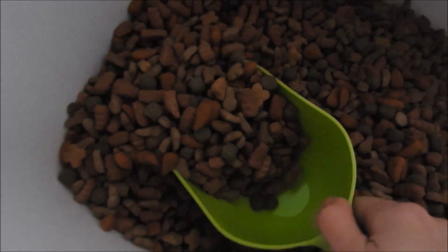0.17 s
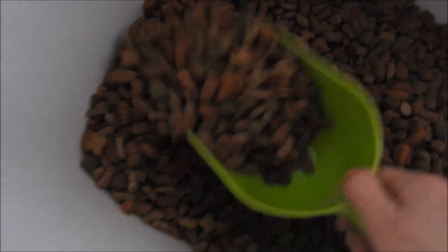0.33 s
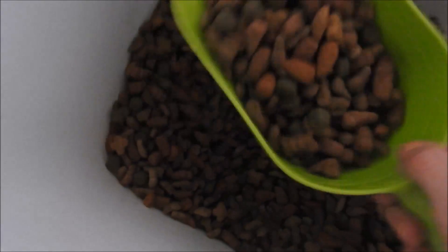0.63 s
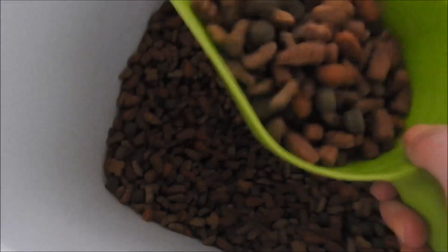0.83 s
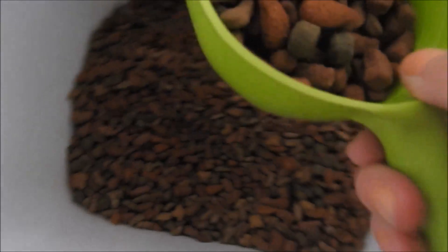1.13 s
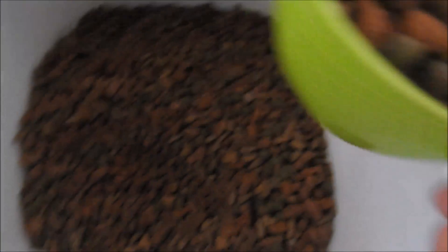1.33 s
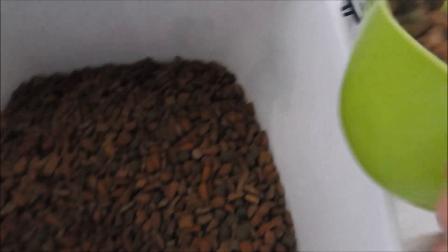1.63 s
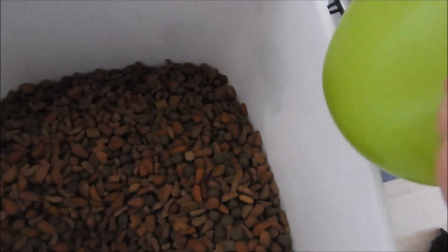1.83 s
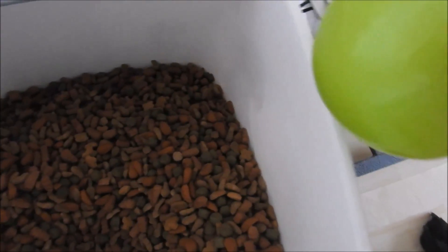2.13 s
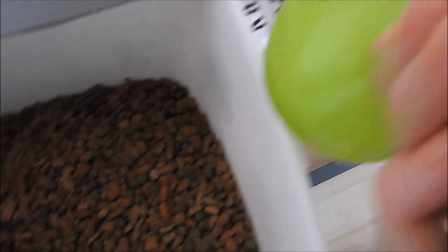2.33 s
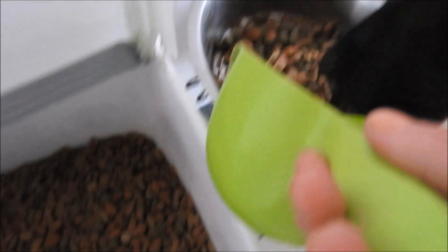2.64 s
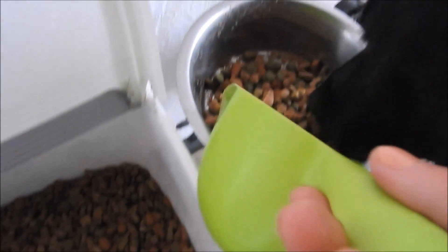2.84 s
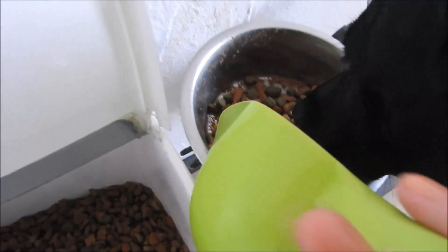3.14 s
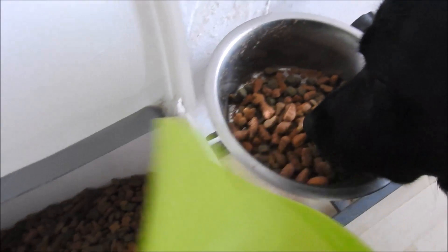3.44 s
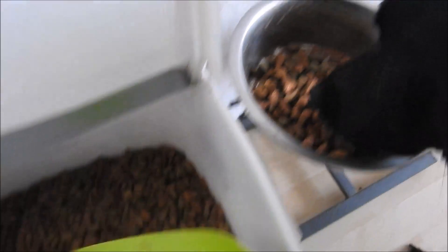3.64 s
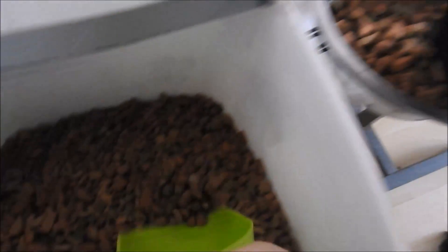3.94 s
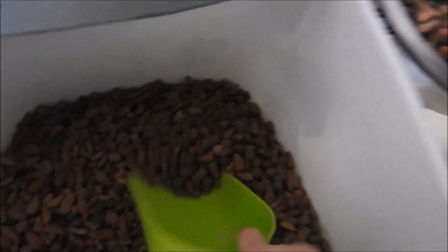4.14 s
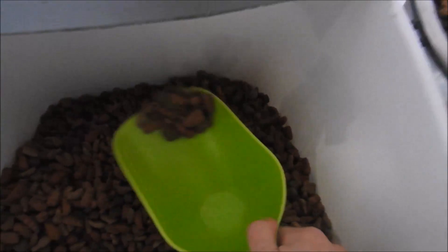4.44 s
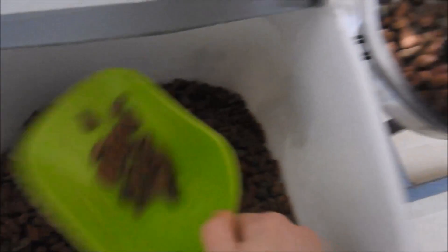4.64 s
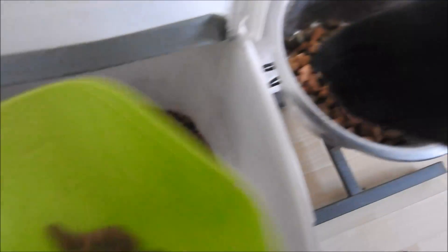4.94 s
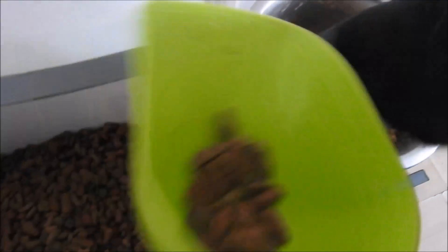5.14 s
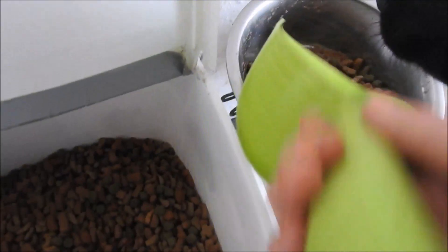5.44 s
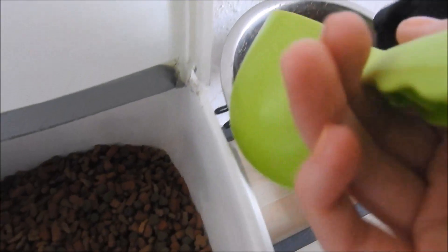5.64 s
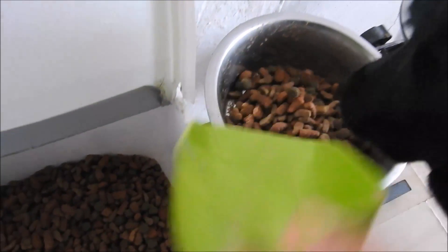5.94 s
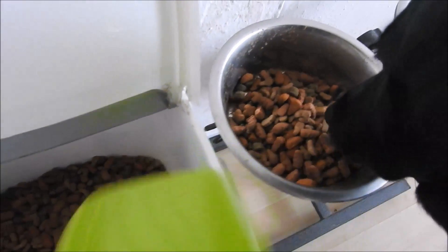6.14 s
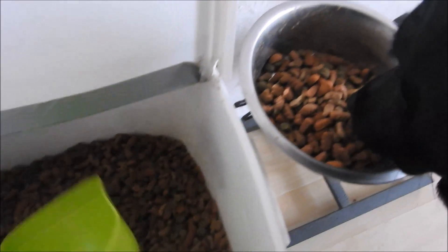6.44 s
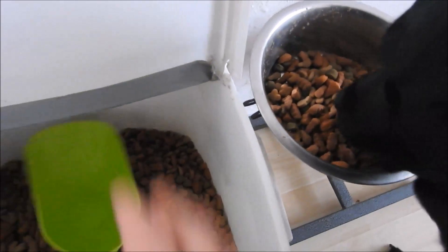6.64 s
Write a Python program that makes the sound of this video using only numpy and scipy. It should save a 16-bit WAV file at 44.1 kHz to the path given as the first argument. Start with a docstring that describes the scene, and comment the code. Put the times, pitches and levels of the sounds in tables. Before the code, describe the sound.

A plastic scoop digs through dry kibble, a scoopful clatters into a steel bowl, a dog crunches faintly, then louder digging and a toss.

```python
"""A plastic scoop digs dry kibble out of a plastic bin and tips it into a steel bowl, in a small room.
A dog crunches a few pellets; the scoop digs again, drops a few more in the bowl and is tossed back in the bin.
Pellet contacts are short noise bursts, coloured as crunch and fizz, that also excite scoop, bin or bowl:
the scoop and the bin's boom are coloured noise and decaying modes, the bowl mostly modes."""
import sys
import numpy as np
from scipy import signal
from scipy.fft import rfft, irfft
from scipy.io import wavfile
from scipy.ndimage import uniform_filter1d

SR = 44100
rng = np.random.default_rng(int(sys.argv[2]) if len(sys.argv) > 2 else 0)


def wrap_up_sound(samples):
    """Save the sound to the file named by the first command line argument, as 16-bit audio."""
    columns = np.atleast_2d(samples).T
    # keep every value between -1 and 1, then stretch to whole-number steps
    tamed = np.clip(columns, -1, 1)
    steps = np.round(tamed * 32767).astype(np.int16)
    wavfile.write(sys.argv[1], SR, steps)


N = 298998  # length [samples]

# spectra of pellet crunch, pellet fizz, scoop hollow and splash on steel: (frequency [Hz], level [dB])
CRUNCH = [(500, -23), (1000, -7), (1300, -2.5), (2000, -0.5), (2450, -3), (2900, -2.5), (3700, -7),
          (4500, 0.5), (6500, -30.5)]
FIZZ = [(2000, -33), (3700, -9.5), (4600, -1), (5800, 0.5), (7500, -3.5), (10000, -6), (16000, -8.5)]
SCOOP = [(30, -52), (150, -18), (280, 1), (430, -2), (560, 2), (700, 4), (850, 2.5), (1030, 2.5),
         (1250, -6.5), (1900, -43)]
STEEL_FIZZ = [(1500, -41.5), (3700, -7.5), (4600, -2.5), (6200, 6.5), (8000, 6.5), (9600, 7.5), (16000, -9)]
# moves of the scoop through packed kibble: digging, lifting, shaking, tilting, digging again, dropped on the heap
# (start [s], attack [s], hold [s], settling t60 [s], crunch level [dB],
#  then relative to crunch: fizz [dB], scoop hollow [dB], bin boom [dB])
DIGS = [(-0.01, 0.0033, 0.2, 0.61, -39, 1, 1, 11.5), (0.09, 0.044, 0.016, 0.24, -27, -1, -1, -4),
        (0.23, .015, .025, 0.16, -48.5, -24, 5.5, 17), (0.43, .08, 0.23, .4, -29, -3.5, -2.5, -5.5),
        (0.78, 0.013, 0.133, 0.4, -32, 1, -7.5, -9.5), (1.08, 0.022, 0.022, 0.061, -44, -10, -3.5, -2.5),
        (1.16, 0.019, 0.091, 0.23, -73.5, -12, 15, 23.5), (1.505, 0.038, 0.04, 0.34, -39.5, 0.5, -9, -2.5),
        (1.715, 0.013, 0.041, 0.71, -36, 1.5, -10.5, -10.5), (1.92, 0.071, 0.13, 0.23, -33, 0, -7.5, -6),
        (2.73, 0.028, 0.025, 0.28, -30, -10, -9.5, -14), (2.93, 0.036, .13, 0.18, -52, 8, -5, -26),
        (3.965, 0.003, 0.23, 0.5, -23, -3.5, -4.5, -3.5), (4.23, 0.033, 0.14, 0.2, -28.5, 1, -4, -5.5),
        (4.455, 0.0069, 0.015, 0.27, -26, -1, -2, 2), (4.53, 0.0068, 0.098, 0.42, -20.5, -5.5, 0.5, -4.5),
        (4.66, 0.032, 0.12, 0.62, -33.5, 0.5, -13, -14), (5.06, 0.022, 0.046, 0.16, -71, 8, 11.5, 29),
        (6.68, 0.0068, 0.058, 0.28, -31, -4, -12.5, -9.5)]
# a few loose pellets sliding along the scoop: (the eight columns of DIGS, chatter pitch [Hz])
SLIDES = [(5.201, 0.081, 0.052, 0.14, -41, 4, -13.5, -18, 3000),
          (5.41, .03, 0.15, 0.32, -55.5, -0.5, -16, -15, 1700),
          (5.551, 0.056, 0.073, .3, -42, 3, -18, -11, 2500),
          (5.63, 0.031, 0.14, 0.44, -32, 2, -6, -19, 2500),
          (5.76, 0.061, .17, 0.37, -38, -3, 9.5, -3.5, 1200),
          (6.031, 0.02, .14, 0.35, -41.5, -1, -8, 6, 1700)]
# air and base of the filled bowl: (frequency [Hz], level [dB], t60 [s])
BOWL_HOLLOW = [(215.3, -4.5, 0.16), (258, -11.5, .13), (566.4, 0, 0.071), (640.7, 3, .15), (675, 0, 0.12),
               (710.8, 7.5, 0.048), (777, -2, 0.047), (985, -11.5, 0.29)]
# the stream drumming on the bowl's wall: (level [dB], hold [s], t60 [s])
POUR_WALL = (-15, 0.036, 1)
POUR_START_S = 2.14


def amp(db):
    """Gain of a level in dB."""
    return 10 ** (np.asarray(db) / 20)


def seconds(length):
    """Time axis in seconds."""
    return np.arange(int(length * SR)) / SR


def read(points, hz):
    """Reads a curve between its points, along log frequency."""
    f, value = np.transpose(points)
    return np.interp(np.log(hz + 1), np.log(f + 1), value)


def add(mix, s, sound):
    """Adds a sound to the mix from a given second on."""
    part = mix[:, max(round(s * SR), 0):][:, :sound.shape[1]]
    part += sound[:, :part.shape[1]]


def unit(x, over=None):
    """Scales to rms 1, over the whole sound or its first seconds."""
    return x / np.sqrt(np.mean(x[..., :over and int(over * SR)] ** 2) + 1e-20)


def steadied(x, size=1500):
    """Scales to a running rms of 1, leaving single grains their contrast."""
    return x / np.sqrt(abs(uniform_filter1d((x ** 2).mean(0), size)) + 1e-12)


def through(x, response):
    """Excites a body, given by its impulse response, with a sound."""
    return signal.oaconvolve(x, np.atleast_2d(response), axes=1)[:, :x.shape[1]]


def colour(x, points, size=4096):
    """Causal minimum-phase filter with the given spectrum."""
    log_gain = np.log(amp(read(points, abs(np.fft.fftfreq(size, 1 / SR)))))
    spectrum = np.exp(np.conj(signal.hilbert(log_gain)))
    return through(x, np.fft.ifft(spectrum).real[:size // 2])


def resonate(x, hz, q):
    """One resonance of gain 1."""
    return signal.lfilter(*signal.iirpeak(hz, q, SR), x)


def ports(x):
    """Two unrelated sounds mixed as two microphone ports hear one source: alike in the bass, apart in the treble."""
    # likeness of the two ports: (frequency [Hz], correlation [0-1])
    likeness = [(60, .995), (560, .98), (1200, .93), (2500, .83), (5300, .72), (8000, .55), (11200, .3)]
    # phase by which left leads: (frequency [Hz], lead [rad])
    left_lead = [(1000, -0.017), (4000, -0.44), (7000, -1.2), (9500, 0.29), (12000, -0.79)]
    n = x.shape[1]
    hz = np.fft.rfftfreq(n, 1 / SR)
    a, b = rfft(x)
    alike = np.clip(read(likeness, hz), -1, 1)
    right = (alike * a + np.sqrt(1 - alike ** 2) * b) * np.exp(-1j * read(left_lead, hz))
    return irfft(np.array([a, right]), n)


def port_noise(n):
    """White noise as the two microphone ports hear it."""
    return ports(rng.standard_normal((2, n)))


def ring(modes, apart=.3, scatter_db=1.5):
    """One blow on a set of decaying modes; the point of contact changes their weights."""
    t, out = seconds(.6), 0
    for hz, db, t60 in modes:
        phase = rng.uniform(0, 2 * np.pi) + apart * rng.standard_normal((2, 1))
        decay = amp(db + scatter_db * rng.standard_normal() - 60 * t / t60)
        out = out + decay * np.sin(2 * np.pi * hz * t + phase)
    return out


def snap(decay, echo_db, echo_decay, size=4096):
    """A brittle contact followed by the scatter off nearby walls: noise with two exponential decays [s]."""
    t = np.arange(size) / SR
    envelope = np.exp(-t / decay) + amp(echo_db) * np.exp(-t / echo_decay)
    burst = rng.standard_normal((2, size)) * envelope
    return ports(np.pad(burst, ((0, 0), (20, 20))))


def grains(per_s, spread_db, decay, tone_db, count=16):
    """Random pellet contacts: many small, few large, in several sorts with a pitch each."""
    out = np.zeros((2, N))
    for hz in np.geomspace(1500, 9000, count):
        grain = snap(decay, echo_db=-12, echo_decay=.005, size=1024)
        tone = resonate(grain, hz, q=2.0)
        chance, size = rng.random(N) * SR * count / per_s, np.zeros(N)
        hit = chance < 1
        size[hit] = amp(spread_db * np.minimum(-np.log(chance[hit]), 4))
        out += through(size[None], unit(grain + amp(tone_db) * tone))
    return out


def swell(attack, hold, t60):
    """Pellets are set moving, keep moving, then settle faster and faster."""
    t = seconds(1.5)
    settling = np.maximum(t - attack - hold, 0) / t60
    return np.clip(t / attack, 0, 1) * amp(-60 * settling ** 1.1)


def levels(moves):
    """Gain curves of crunch, fizz, hollow and boom; overlapping moves add in power."""
    power = np.zeros((4, N))
    for start, attack, hold, t60, db, fizz_db, hollow_db, boom_db, *_ in moves:
        gains = amp(db + np.array([0, fizz_db, hollow_db, boom_db]))
        add(power, start, np.outer(gains, swell(attack, hold, t60)) ** 2)
    return np.sqrt(power)


def stroke(moves, contacts, pellet_colour, fizz_colour, scoop_colour):
    """Contacts sound directly, fizz, and shake the scoop and the bin wall."""
    # spectrum of the booming bin: (frequency [Hz], level [dB])
    bin_boom = [(25, -33.5), (50, -25), (75, -5.5), (96, 0), (125, -8.5), (160, -0.5), (200, 2.5),
                (260, -4.5), (350, -8), (600, -53)]
    crunch, fizz, hollow, boom = levels(moves)
    wall = colour(contacts + .5 * contacts.std() * port_noise(N), bin_boom)
    out = crunch * steadied(colour(contacts, pellet_colour))
    out = out + fizz * steadied(colour(contacts, fizz_colour))
    out = out + hollow * steadied(colour(contacts, scoop_colour))
    return out + boom * steadied(wall, size=2400)


def surges():
    """Kibble sticks and gives way: a random gain gliding between new values every 22 ms."""
    t = np.arange(N) / SR
    surge = np.interp(t / .022, np.arange(N), np.clip(rng.standard_normal(N), -2, 2))
    return unit(amp(3 * surge))


def chatter(contacts):
    """Sliding pellets chatter at a pitch of their own, through one sharp resonance."""
    out = np.zeros((2, N))
    for start, attack, hold, t60, db, *_, hz in SLIDES:
        gain = amp(db - 5.5) * swell(attack, hold, t60)
        add(out, start, gain * steadied(resonate(contacts[:, :len(gain)], hz, q=22)))
    return out


def rustle():
    """Packed pellets grind densely; the loose ones slide along the scoop in a thinner stream of contacts."""
    # spectra of the nearly empty scoop (loose crunch, thinner fizz, hollow): (frequency [Hz], level [dB])
    loose_crunch = [(500, -5.5), (1100, 1), (1580, 0), (1900, -1), (2500, 8), (2900, -5), (3700, -3),
                    (4500, 4), (6500, -35)]
    loose_fizz = [(2000, -34), (3700, -12), (5000, -1), (7500, -2), (10000, 0), (16000, -5.5)]
    empty_scoop = [(30, -63), (150, -4), (300, -19), (520, -7), (620, 2), (685, 6), (750, 4), (840, -23),
                   (1000, -4), (1120, -5), (1300, -16), (1900, -19)]
    packed = grains(per_s=900, spread_db=2.0, decay=0.00014, tone_db=1.0)
    loose = grains(per_s=400, spread_db=1.0, decay=0.000071, tone_db=0.0)
    digging = amp(-1.0) * surges() * stroke(DIGS, packed, CRUNCH, FIZZ, SCOOP)
    sliding = amp(-3.4) * stroke(SLIDES, loose, loose_crunch, loose_fizz, empty_scoop)
    return digging + sliding + chatter(loose)


def crack(db, fizz_db, hollow_db, pellet_hz):
    """A pellet slips or drops: a sharp tick, its own brief ring, and a hollow knock of the scoop."""
    # scoop modes: (frequency [Hz], level [dB])
    scoop_modes = [(490, 9), (690, -1.5), (950, 9), (1060, 4.5), (1170, 7)]
    tick = colour(snap(decay=.0014, echo_db=-14, echo_decay=.008), FIZZ)
    body = colour(snap(decay=.0022, echo_db=-14, echo_decay=.008), CRUNCH)
    body = body + amp(18.0) * resonate(body, pellet_hz, q=10)
    knock = colour(snap(decay=0.0012, echo_db=-17.5, echo_decay=0.0042), SCOOP)
    knock = knock + sum(amp(mode_db) * resonate(knock, hz, q=21) for hz, mode_db in scoop_modes)
    parts = [(body, 0), (tick, fizz_db), (knock, hollow_db - 5.5)]
    return amp(db) * sum(amp(part_db) * unit(part, over=0.0049) for part, part_db in parts)


def slips(count=8):
    """Pellets of several pitches slip at random, as loud and as hollow as the move that shifts them."""
    slips_per_s, spread_db = 22, 2.5
    crunch, fizz, hollow, _ = 20 * np.log10(levels(DIGS + SLIDES) + 1e-9)
    out, pitches = np.zeros((2, N)), np.geomspace(1300, 3600, count)
    due = (rng.random(N) < slips_per_s / SR) & (crunch > -48)  # only while kibble clearly moves
    for i in np.flatnonzero(due):
        # offsets from the move's own crunch, fizz and hollow
        db, fizz_db, hollow_db = spread_db * (2 * rng.random(3) - 1) + [2, 0.5, 1.5]
        fizz_db += fizz[i] - crunch[i]
        hollow_db += hollow[i] - crunch[i]
        add(out, i / SR, crack(crunch[i] + db, fizz_db, hollow_db, rng.choice(pitches)))
    return out


def cracks():
    """Single pellet cracks that stand out from the rustle."""
    # (time [s], crunch level [dB], fizz re crunch [dB], hollow setting re crunch [dB], pellet pitch [Hz])
    loud_cracks = [(0.0528, -24.5, -2.5, -29, 2990), (0.34, -26, -12, -6, 2920),
                   (0.3539, -21, 10.5, -4.5, 3040), (0.3575, -16.5, -29.5, -26.5, 2890),
                   (0.3798, -26.5, -23, -14, 2960), (0.427, -28.5, -8, -27, 3070),
                   (0.494, -26.5, -3, -11, 3495), (0.5413, -22, 2, -3.5, 2400),
                   (0.603, -26.5, -4, -3, 3530), (0.687, -22.5, -2, -32, 1690), (0.8336, -27, 5.5, 3, 3340),
                   (0.7265, -25, 8, -1, 3273), (0.8099, -22.5, 2.5, -8, 3640),
                   (0.8814, -24, 6.5, -18, 3500), (0.9042, -22, 10, -18, 2280),
                   (0.9299, -30, 5.5, -22, 2720), (1.009, -34, 3, -1, 3360), (1.2012, -47.5, -19, 12, 1600),
                   (1.2515, -45, -29, 14.5, 1533), (1.7256, -35, 5.5, -12, 3140),
                   (1.803, -28.5, 6.5, 2, 1542), (1.971, -22.5, -18, -17.5, 2650),
                   (2.968, -44, 5, 12.5, 1230), (3.213, -42.5, -6, -16, 3000), (3.968, -22.5, -1, -1, 1897),
                   (4.0542, -29, 8.5, -21, 2000), (4.121, -24, 13, -2, 1680), (4.142, -17.5, 3, -30, 2082),
                   (4.342, -20, 2, -5.5, 2620), (4.4029, -17, -15.5, -27, 2433),
                   (4.368, -24.5, -14, -3, 2520), (4.4625, -23.5, 3.5, -15, 2700),
                   (4.538, -17.5, 3.5, 5.5, 1900), (4.5551, -24, 9, 14, 1230), (4.584, -16, -7, -18, 1150),
                   (4.605, -29, -15, 18.5, 1700), (4.628, -12, -3.5, -11, 1120), (4.682, -23, 7, -2, 2350),
                   (4.7725, -10, -7, -8, 2960), (4.8325, -26.5, 5, -9, 2740), (4.857, -26, 7, -2.5, 3180),
                   (5.1704, -47, -26, 1, 3070), (5.649, -20.5, 4.5, -10, 1510),
                   (5.8049, -30.5, 6.5, 1, 2447), (6.0759, -25, -12.5, 7, 1470),
                   (6.0893, -29.5, 17, 4, 1816), (6.0924, -23.5, 12.5, -3, 2000),
                   (6.683, -17, 10.5, -7.5, 2048), (6.6866, -16.5, -2, -28, 2740),
                   (6.748, -16, 4.5, -32, 3770), (6.753, -23.5, 2, -10, 3560)]
    out = np.zeros((2, N))
    for s, *sound in loud_cracks:
        add(out, s, crack(*sound))
    return out


def bumps():
    """The scoop knocks hollowly against packed kibble; each soft blow rings one of its modes."""
    # (time [s], level [dB], frequency of the mode that answers [Hz])
    scoop_bumps = [(0.2463, -25.5, 448), (0.271, -35, 498), (0.545, -30, 567), (0.6573, -27.5, 436),
                   (0.728, -32, 514), (1.098, -49, 432), (1.122, -37, 444), (1.802, -19.5, 384),
                   (3.97, -23.5, 668), (4.2153, -31, 950.4), (4.435, -21.5, 512), (4.445, -37, 466),
                   (5.649, -19, 1057), (5.652, -26.5, 261), (5.826, -27, 680.7), (5.87, -22.5, 697),
                   (6.076, -27, 330), (6.139, -26, 572), (6.1592, -30.5, 712)]
    out = np.zeros((2, N))
    for s, db, hz in scoop_bumps:
        knock = colour(snap(decay=0.0016, echo_db=-9.5, echo_decay=0.013), SCOOP)
        add(out, s, amp(db) * unit(knock + amp(17) * resonate(knock, hz, q=17), over=0.0039))
    return out


def knocks():
    """The scoop bumps the bin, whose wall booms like a slack drum."""
    # knocks on the wall: (time [s], level [dB])
    wall_knocks = [(0.804, -32.5), (1.535, -35), (1.803, -15), (2.756, -40.5), (3.758, -55.5), (4.584, -21),
                   (5.067, -51), (5.65, -45), (6.073, -37.5), (6.685, -41), (6.75, -38)]
    # wall modes: (frequency [Hz], level [dB], t60 [s])
    wall_modes = [(72, -19, .25), (98, -1, .27), (122, -8, .24), (149, -4, .25), (197, -4, .13),
                  (218, -18, .26), (285, -15, .24)]
    soft_onset = 1 - np.exp(-seconds(.6) / 0.0086)
    out = np.zeros((2, N))
    for s, db in wall_knocks:
        boom = unit(ring(wall_modes, apart=0.097, scatter_db=-1.5), over=0.07)
        add(out, s, amp(db) * boom * soft_onset)
    return out


def bare_steel(s):
    """Share of the bowl's wall not yet muffled by the heap."""
    return np.clip(np.interp(s, [2.12, 2.35, 2.6], [.65, .4, .08]), 0, 1)


def steel_ring(t60_at_1k, tilt_db, evenness):
    """The bowl's wall modes in close pairs, detuned by the shifting load; many contacts even out their weights."""
    # wall modes: (frequency [Hz], level before evening and tilt [dB])
    wall_modes = [(963.6, -43.5), (1287, -23), (1448, -37.5), (1599, -16), (1723, -32), (1798, -42),
                  (1906, -48), (1970, -48.5), (2159, -36), (2315, -41), (2859, -31.5), (2929, -33),
                  (3004, -39.5), (3391, -34.5), (3505, -46), (3671, -48.5), (3957, -33.5), (4167, -42)]
    mean_db = np.mean([db for hz, db in wall_modes])
    modes = []
    for hz, db in wall_modes:
        db = db + evenness * (mean_db - db) + tilt_db * np.log2(hz / 1000)
        t60 = t60_at_1k * (1000 / hz) ** 0.14
        partner_hz = hz * (1 + 0.026 * rng.standard_normal())
        modes += [(hz, db, t60), (partner_hz, db - 3, t60 / 2)]
    return ring(modes, apart=.18, scatter_db=3)


def shimmer(t60, crowd_db, count=70):
    """The crowd of high modes of thin steel, at random pitches, with fixed modes, some louder than the crowd."""
    # fixed high modes, some louder than the crowd: (frequency [Hz], level [dB], t60 [s])
    top_modes = [(5394, -23.5, 0.27), (6400, -16.5, 0.24), (7400, -3.5, 0.18), (7730, -5.5, 0.28),
                 (8650, -4, 0.16), (10100, -15, 0.17)]
    crowd = [(hz, crowd_db, t60) for hz in rng.uniform(4200, 11500, count)]
    return ring(crowd + list(top_modes), apart=.37, scatter_db=3)


def strikes(top):
    """A clump hits the bowl: wall modes, dull clang, splash of treble, rim note and hollow of the base."""
    # clumps landing in the bowl: (time [s], strength [dB])
    landings = [(2.0844, -12), (2.0966, -14.5), (2.1544, -9.5), (2.1752, -15), (2.212, -12), (2.2646, -12),
                (2.3346, -17.5), (2.3839, -19), (2.4458, -27.5), (2.543, -22.5), (2.5826, -26),
                (2.6127, -25), (2.7399, -32), (5.9798, -23.5), (6.2159, -21.5)]
    # ring, splash and hollow offsets as pellets cover the base: (on steel [dB], on pellets [dB])
    land_ring = (0.1, -14.5)
    land_splash = (-13, 0.1)
    land_hollow = (-7.5, -21)
    # spectrum of the wall deadened by pellets lying on it: (frequency [Hz], level [dB])
    dull_clang = [(700, -34), (1100, -27), (1300, 5), (1600, 4), (1900, 0.5), (2500, -13), (2900, -13.5),
                  (3700, -13), (6000, -29)]
    # the long, thin rim note: (frequency [Hz], level [dB], t60 [s])
    rim_note = (3580, -22.5, .5)
    cover_s = .15  # time constant of the base being covered
    out = np.zeros((2, N))
    for s, db in landings:
        bare, covered = bare_steel(s), 1 - np.exp(-(s - landings[0][0]) / cover_s)
        ring_db, splash_db, hollow_db = (db + on_steel + covered * (on_pellets - on_steel)
                                         for on_steel, on_pellets in (land_ring, land_splash, land_hollow))
        wall = unit(steel_ring(t60_at_1k=.26, tilt_db=-7, evenness=.1), over=.015)
        clang = unit(colour(snap(decay=0.044, echo_db=0.5, echo_decay=0.037), dull_clang), over=0.038)
        splash = colour(snap(decay=0.01, echo_db=-10.5, echo_decay=0.024), STEEL_FIZZ)
        add(out, s, amp(ring_db + 0.2) * np.sqrt(bare) * wall)
        add(out, s, amp(ring_db - 1.0) * np.sqrt(1 - bare) * clang)
        add(out, s, amp(splash_db + 0.5) * unit(splash, over=0.021))
        if s > POUR_START_S + POUR_WALL[2]:  # the rim rings freely only once the stream has faded
            add(out, s, amp(splash_db) * ring([rim_note]))
        add(out, s, amp(splash_db - 2.5) * unit(top, over=.015))
        add(out, s, amp(hollow_db + 5.0) * unit(ring(BOWL_HOLLOW, apart=.08), over=0.009))
    return out


def stream(db, hold, t60):
    """Gain curve of one sound of the pour: it builds up, holds, then thins out as the scoop empties."""
    gain = np.zeros((1, N))
    add(gain, POUR_START_S, amp(db) * swell(0.017, hold, t60)[None])
    return gain


def pour():
    """The stream of pellets drums on the bowl; the growing heap takes over from bare steel."""
    # treble and hollow of the stream: (level [dB], hold [s], t60 [s])
    pour_fizz = (-21, 0.16, 1)
    pour_hollow = (-30, 0.36, 0.79)
    contacts = grains(per_s=1500, spread_db=2.0, decay=0.00074, tone_db=0)
    bare = bare_steel(np.arange(N) / SR)
    steel = steadied(through(contacts, steel_ring(t60_at_1k=.35, tilt_db=2, evenness=.45)))
    heap = steadied(colour(contacts, CRUNCH))
    middle = np.sqrt(bare) * steel + np.sqrt(1 - bare) * heap
    treble = amp(-3.5) * steadied(through(contacts, shimmer(t60=0.31, crowd_db=-10.5)))
    treble = treble + steadied(colour(contacts, STEEL_FIZZ))
    low = amp(-2.0) * steadied(through(contacts, ring(BOWL_HOLLOW, apart=0.071)))
    low = low + amp(-5.5) * steadied(colour(contacts, SCOOP))
    return stream(*POUR_WALL) * middle + stream(*pour_fizz) * treble + stream(*pour_hollow) * low


def bites():
    """A pellet breaks between the dog's teeth in a quick run of splinters: a burst of uneven loudness."""
    # biting and nudging pellets: (time [s], crunch setting [dB], hollow of the bowl re crunch [dB])
    dog_bites = [(2.877, -43, -7), (2.9154, -42.5, -8), (2.9505, -43, -8), (3.211, -42, -1.5),
                 (3.2237, -39, -14), (3.33, -42.5, -5), (3.345, -42.5, -6), (3.3944, -46.5, 2.5),
                 (3.5587, -50, 0), (3.5726, -52, -6), (3.7179, -51, -7.5), (6.4415, -52.5, 1.5),
                 (6.603, -48, -20)]
    out = np.zeros((2, N))
    for s, db, hollow_db in dog_bites:
        crumble = snap(decay=.0033, echo_db=3, echo_decay=.016)
        unevenness = unit(uniform_filter1d(rng.standard_normal(crumble.shape[1]), size=50))
        crumble = crumble * amp(3.6 * unevenness)
        parts = [(CRUNCH, 0), (FIZZ, 5.5), (SCOOP, hollow_db)]
        bite = sum(amp(part_db) * unit(colour(crumble, points), over=0.005) for points, part_db in parts)
        add(out, s, amp(db + 0.15) * bite)
    return out


def at_scoop(x):
    """Places a sound where the scoop is, by a level difference between the sides."""
    # (time [s], left over right [dB])
    scoop_pan = [(0, -0.5), (0.7, 1.5), (1.9, -2), (4.7, 1), (5.7, -1), (6.7, 4)]
    pan_db = np.interp(np.arange(N) / SR, *np.transpose(scoop_pan))
    return x * amp([pan_db / 2, -pan_db / 2])


def room(x):
    """A diffuse tail of noise, each band dying at its own speed."""
    # room decay: (frequency [Hz], t60 [s])
    room_decay = [(100, 0.56), (700, 0.41), (2000, 0.27), (5000, 0.27), (12000, 0.21)]
    hz, t, z = signal.stft(port_noise(SR // 2), SR, nperseg=256)
    tail = signal.istft(z * amp(-60 * t / read(room_decay, hz)[:, None]), SR, nperseg=256)[1]
    tail = tail * np.clip(np.arange(tail.shape[1]) / SR / 0.0011, 0, 1)
    return through(x, tail / np.linalg.norm(tail[0]))


def room_floor():
    """The steady background of the room: coloured noise."""
    # spectrum: (frequency [Hz], relative level per Hz [dB])
    floor_colour = [(15, -41), (25, -17.5), (93, -1), (190, -1.5), (228, 1.5), (344, -20.5), (412, -11),
                    (867, -19.5), (1380, -13.5), (1780, -18.5), (2620, -18), (3060, -21), (11600, -22),
                    (15100, -59), (22000, -120)]
    return amp(-54.5) * unit(colour(port_noise(N), floor_colour))


def scene():
    """Scoop and bin are close; bowl and dog lie farther off, with more of the room."""
    near = at_scoop(rustle() + amp(1.0) * cracks() + slips()) + bumps() + knocks()
    far = strikes(shimmer(t60=0.15, crowd_db=-17)) + pour() + amp(1.0) * bites()
    return near + far + room(amp(-10.5) * near + amp(-6.0) * far) + room_floor()


def record(dry):
    """The microphone's bass and treble roll-off, overload on the hardest hits, then the band limit."""
    # microphone response: (frequency [Hz], level [dB])
    mic_response = [(20, -13), (70, -1.5), (9700, -1), (10500, -4), (11500, -10), (13000, -20),
                    (16000, -38)]
    heard = colour(dry, mic_response)
    heard = heard / (1 + (heard / 1.05) ** 6) ** (1 / 6)  # soft ceiling at 1.05
    band_limit = signal.firwin(255, 15900, window=("kaiser", 8), fs=SR)
    return signal.oaconvolve(heard, band_limit[None], "same")


dry = scene()
out = record(dry)
wrap_up_sound(out)
```